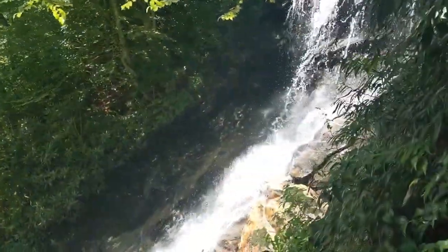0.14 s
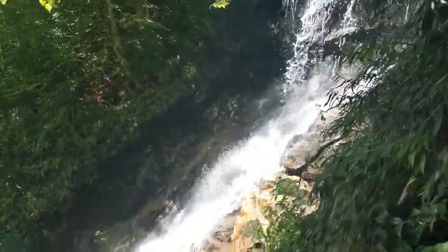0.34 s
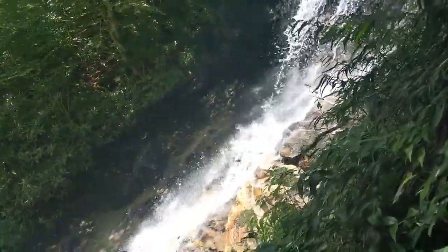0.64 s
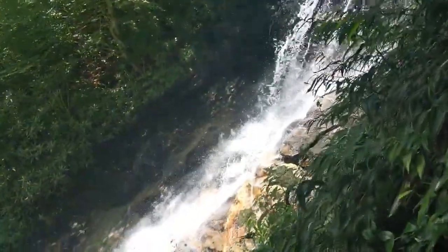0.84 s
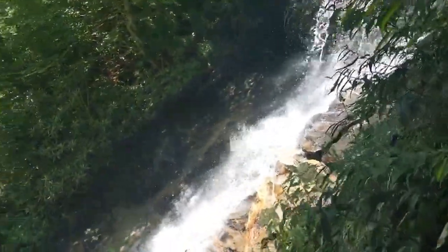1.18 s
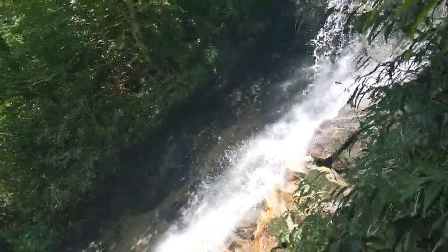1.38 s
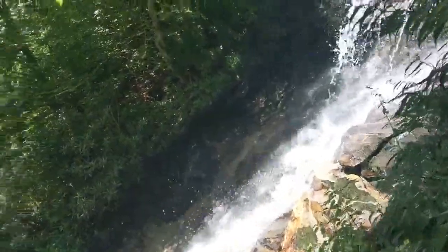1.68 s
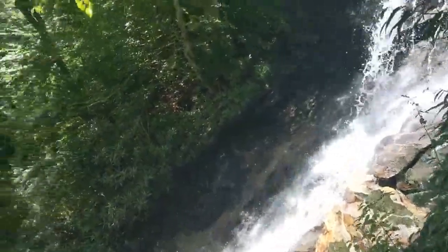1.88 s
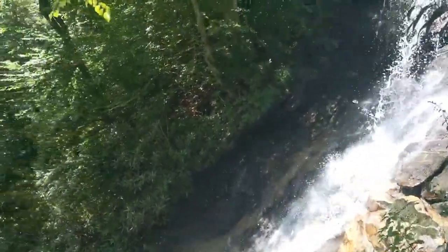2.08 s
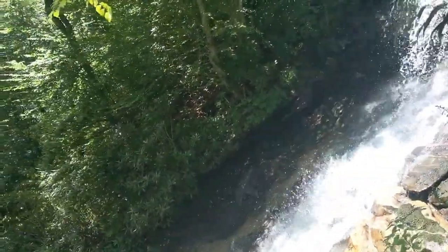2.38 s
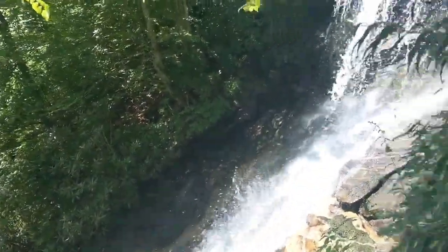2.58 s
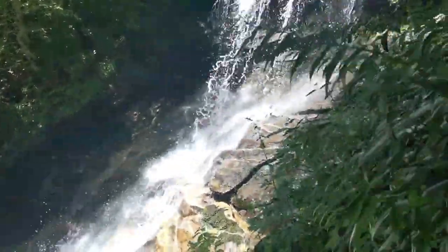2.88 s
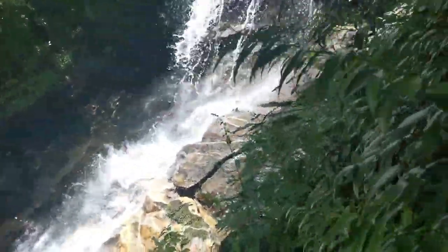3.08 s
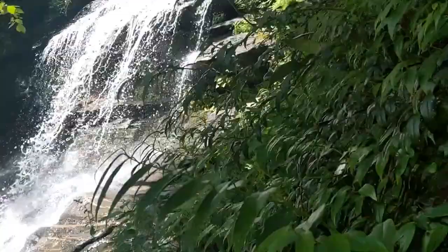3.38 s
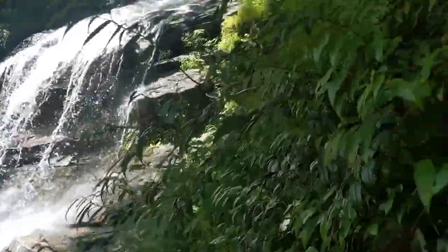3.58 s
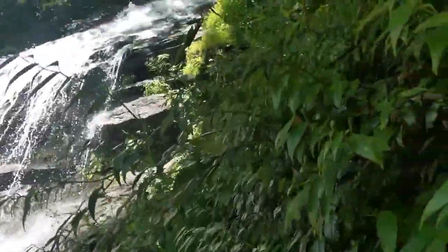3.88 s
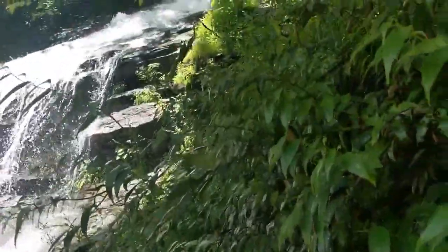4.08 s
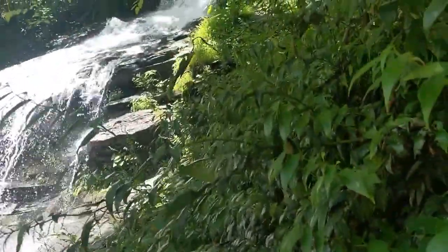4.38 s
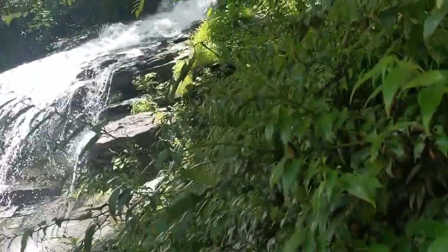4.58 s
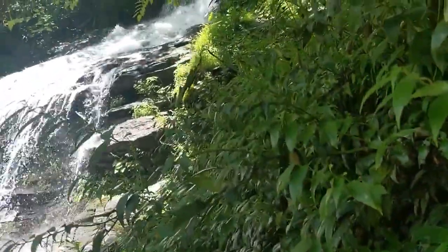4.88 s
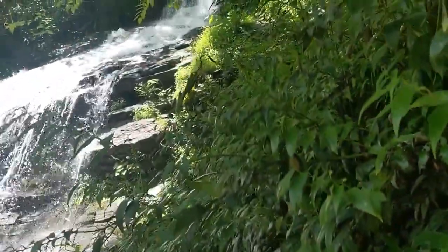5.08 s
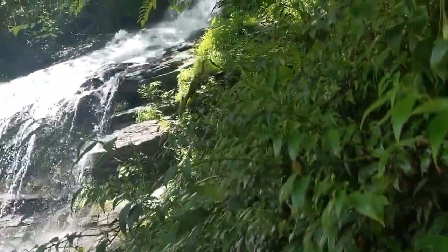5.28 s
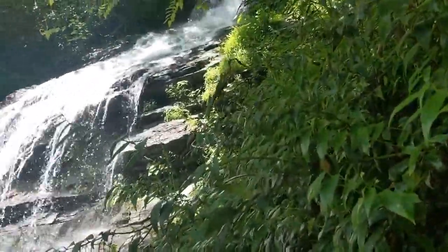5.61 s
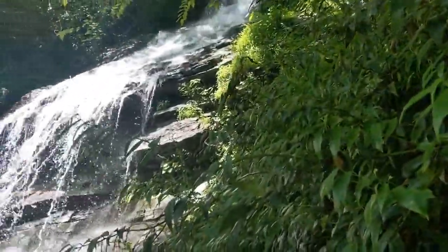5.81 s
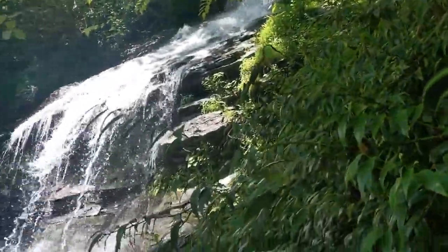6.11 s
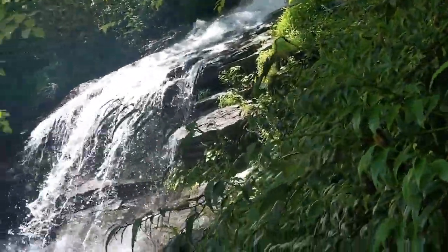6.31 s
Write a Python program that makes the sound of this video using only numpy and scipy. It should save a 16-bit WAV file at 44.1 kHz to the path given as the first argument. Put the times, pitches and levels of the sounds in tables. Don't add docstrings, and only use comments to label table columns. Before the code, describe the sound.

A waterfall rushes steadily down rocks among trees, heard from the bank in wide stereo. Countless drops merge into a bright, dense hiss over a churning middle and a modest low rumble. Irregular lumps of water slump with soft, hollow gulps. The flow grows slightly fuller until nearly four seconds, then stays strong, while the stereo picture shifts as the microphones turn away, leaning left in the low middle.

```python
import sys
import numpy as np
from scipy import signal
from scipy.fft import rfft, irfft, next_fast_len
from scipy.io import wavfile

SR = 44100
rng = np.random.default_rng(int(sys.argv[2]) if len(sys.argv) > 2 else 0)


def materialize(psi):
    bounded = np.clip(np.atleast_2d(psi).T, -1, 1)
    quanta = np.round(bounded * 32767).astype(np.int16)
    wavfile.write(sys.argv[1], SR, quanta)


def attenuation_scalar(level_db):
    decades = np.asarray(level_db, float) / 20
    return 10 ** decades


N = 284445
PAD = next_fast_len(N + 4096)
HZ = np.arange(PAD // 2 + 1) * SR / PAD + 1e-3


def in_time(rows):
    s, *columns = np.transpose(rows)
    return [np.interp(np.arange(N) / SR, s, column) for column in columns]


def in_pitch(rows):
    hz, *columns = np.transpose(rows)
    return [np.interp(np.log(HZ), np.log(hz), column) for column in columns]


def drift(rate):
    pole = np.exp(-80 * np.pi * rate / SR)
    coarse = rng.standard_normal(N // 40 + 3002)
    slow = signal.lfilter([1], [1, -2 * pole, pole * pole], coarse)[3000:]
    return np.interp(np.arange(N) / 40, np.arange(len(slow)), slow / slow.std())


def drops(near_per_s, near_db, uneven_db):
    hiss = rng.standard_normal((3, N))
    lands = rng.random((3, N)) < near_per_s / SR
    unevenness = np.minimum(rng.exponential(1, (3, N)), 2)
    sizes = attenuation_scalar(near_db + uneven_db * unevenness)
    return hiss + lands * sizes * rng.choice([-1, 1], (3, N))


# time in seconds, level in dB.
FLOW = [
    (0.0, -32),
    (0.12, -31.5),
    (0.93, -31),
    (1.47, -30.5),
    (3.5, -30),
    (3.72, -28.5),
    (5.77, -29),
    (5.78, -30),
    (6.16, -29),
    (6.45, -30),
]
# frequency in Hz, spectral density in dB per Hz.
RUSH_COLOUR = [(13, -34.5), (22, -17.5), (81, -15.5), (199, -12), (235, -15), (336, -9.5), (389, -12),
               (511, -8), (919, -6), (1180, -7), (1620, -5), (2040, -6.5), (3300, -1.5), (4290, -12),
               (7260, -120)]
# frequency in Hz, level relative to 3300 Hz in dB.
SPRAY_SLOPE = [(3300, 0.0), (6600, -3.2), (10500, -6.9), (12700, -8.9), (15800, -4.2)]
# centre in Hz, share of the flow's swing from 0 to 1,
# change when turned away in dB, swell around a slump in dB.
PARTS = [
    (28, .1, -8, 3),
    (70, .1, -0.5, 1.5),
    (220, .1, -.5, 3.0),
    (800, 0.27, -1, 1.2),
    (3470, .99, -0.4, 0.3),
]


def rush(surge_db, patch_db, flicker_db, lumpy_db):
    treble_db = RUSH_COLOUR[-3][1] + in_pitch(SPRAY_SLOPE)[0]
    colour_db = np.where(HZ < 3300, in_pitch(RUSH_COLOUR)[0], treble_db)
    water = rfft(drops(near_per_s=250, near_db=7.5, uneven_db=3.1), PAD) * attenuation_scalar(colour_db)
    part_hz, *response = np.transpose(PARTS)
    flow_db = in_time(FLOW)[0]
    swell_db = np.transpose(response) @ [flow_db - flow_db.mean(), in_time(TURN)[0] - .5, heave()]
    surge, patch, lumps = drift(8.6), drift(12), drift(27)
    out = np.zeros((3, N))
    for hz in 25 * 2 ** np.arange(0, 9.6, .5):
        share = np.maximum(1 - np.abs(np.log2(HZ / hz)) / .5, 0)
        weights = [np.interp(np.log(hz), np.log(part_hz), row) for row in np.eye(len(PARTS))]
        patch = .8 * patch + .6 * drift(12)
        chance_db = surge_db * surge + patch_db * patch + flicker_db * drift(26)
        chance_db = chance_db + lumpy_db * lumps / (1 + (hz / 500) ** 2)
        band = irfft(water * share, PAD)[:, :N]
        out += band * attenuation_scalar(weights @ swell_db + chance_db)
    return out / out.std() * attenuation_scalar(flow_db.mean() + 1.5)


BIG_SLUMP_DB = -40
SLUMP_S = .05


def heave():
    rise_s = 0.053
    s, slump_db, _ = np.transpose(SLUMPS)
    t = np.arange(0, N, 64) / SR
    since = np.maximum(t[:, None] - s + SLUMP_S / 2, 0) / rise_s
    bumps = attenuation_scalar(slump_db - BIG_SLUMP_DB) * since * np.exp(1 - since)
    return np.interp(np.arange(N) / SR, t, bumps.sum(axis=1))


# start in seconds, level in dB, middle pitch in Hz.
SLUMPS = [(0.12, -40.5, 140), (0.18, -44, 271), (0.31, -48.5, 180), (0.4, -46.5, 230), (0.69, -57, 60),
          (1.08, -48.5, 325), (1.21, -41, 250), (1.28, -44.5, 148), (2.08, -37.5, 594), (2.25, -41, 335),
          (2.33, -47.5, 160), (2.621, -50, 150), (2.92, -37.5, 475), (3.13, -43.5, 252), (3.26, -42, 280),
          (3.57, -39, 333), (3.63, -41, 370), (3.881, -45, 374), (4.21, -36, 390), (4.94, -39.5, 288),
          (5.27, -57, 90), (5.59, -37, 374), (5.65, -42, 352), (6.07, -38.5, 386), (6.38, -44, 600)]


def pockets(cycles, level_db, tilt_db, focus_db, count):
    out = np.zeros((3, N + SR))
    t = np.arange(round(.07 * SR)) / SR
    for (s, slump_db, hz), luck in zip(SLUMPS, rng.random((len(SLUMPS), count, 2))):
        octaves = max(1.82 + 0.13 * (slump_db - BIG_SLUMP_DB), .4)
        late = luck[:, :1] ** 1.3
        size = luck[:, 1:]
        pitch = octaves * np.linspace(-1, 1, count)[:, None]
        turns = hz * 2 ** pitch * t
        rings = np.sin(2 * np.pi * turns * (1 + 0.025 * turns)) * turns * np.exp(-turns / cycles)
        rings = rings * attenuation_scalar(tilt_db * pitch - focus_db * (pitch / octaves) ** 2 - 7 * size - 4 * late)
        energy = np.sum(rings ** 2) / len(t)
        rings = rings * attenuation_scalar(slump_db + level_db) / np.sqrt(energy)
        for k, ring in enumerate(rings):
            row = [0, 0, 1, 0, 2][k % 5]
            start = round((s + SLUMP_S * late[k, 0]) * SR)
            out[row, start:start + len(t)] += (-1) ** k * ring
    return out[:, :N]


def puff():
    start_s, length_s, level_db, hz = 1.47, 0.044, -50, 130
    band = signal.butter(2, [hz / 2, hz * 1.5], "band", fs=SR, output="sos")
    wind = signal.sosfilt(band, rng.standard_normal(N))
    shape = np.exp(-((np.arange(N) / SR - start_s) / length_s) ** 4)
    return np.outer([1, 0], attenuation_scalar(level_db) * shape * wind / wind.std())


# frequency in Hz, left-right level in dB.
PORT_STEP = [(6500, -0.03), (12000, -2), (15000, 3.5)]


def ports(water, picture):
    alike, lead, step_db = in_pitch(picture)
    alike = np.clip(alike, 0, 1)
    step_db = step_db + in_pitch(PORT_STEP)[0]
    shared, own = np.sqrt(alike) * water[0], np.sqrt(1 - alike)
    left = shared + own * water[1]
    right = shared * np.exp(-1j * lead) + own * water[2]
    return irfft(np.array([left * attenuation_scalar(step_db / 2), right * attenuation_scalar(-step_db / 2)]), PAD)[:, :N]


# time in seconds, direction from 0 (facing) to 1 (turned away).
TURN = [
    (0, 0),
    (2.5, .05),
    (3.2, .45),
    (3.7, .9),
    (4.1, .99),
    (6.45, .99),
]
# frequency in Hz, likeness of the ports from 0 to 1,
# lead of the left port in radians, left-right level in dB.
FACING = [(60, .88, -.2, 1.0), (170, .92, -.35, 1.3), (300, .86, -.7, 1.8), (480, .77, -.9, 1.8),
          (1000, .72, -.4, 3.7), (1400, .63, -.1, 5.7), (2200, .14, -1.5, 2.6), (6500, .06, -3.4, 2.2)]
TURNED = [(170, .97, -.25, 1.5), (300, .88, -.6, 5.7), (500, .65, -.1, 11.0), (1150, .6, .9, 7.0),
          (1750, .17, 2.9, 5.3), (2200, .23, 4.0, 2.4), (3000, .28, 5.9, 2.1), (4500, .05, 8.8, 2.0)]


def scene():
    water = rush(surge_db=-0.15, patch_db=0.5, flicker_db=0.59, lumpy_db=1.16)
    water = water + pockets(cycles=0.72, level_db=-1.5, tilt_db=7.5, focus_db=8.5, count=70)
    water = rfft(water, PAD)
    turn = np.clip(in_time(TURN)[0], 0, 1)
    return (1 - turn) * ports(water, FACING) + turn * ports(water, TURNED) + puff()


def top_cut(x):
    return signal.sosfilt(signal.butter(12, 15765, fs=SR, output="sos"), x)


# centre in Hz, width in Hz, left gain in dB, right gain in dB.
PORT_MODES = [(950, 220, 1.6, 1.6), (2000, 350, -2.5, -3), (4150.0, 610.0, 1.6, 1.7),
              (5710.0, 1010.0, 5.0, 5.1), (7490.0, 1070.0, 4.4, 4.8), (9540.0, 1240.0, 5.8, 5.6),
              (11610.0, 990.0, 4.4, 5.0), (13840.0, 1400.0, 4.0, 4.2), (15580.0, 730.0, 0.8, -2.0)]


def record(dry):
    ripple_db = 0
    for hz, width, left_db, right_db in PORT_MODES:
        resonance = 1 / (1 + (2 * (HZ - hz) / width) ** 2)
        ripple_db = ripple_db + np.outer([left_db, right_db], resonance)
    heard = irfft(rfft(dry, PAD) * attenuation_scalar(ripple_db) * (HZ < 15765), PAD)[:, :N]
    balance = attenuation_scalar(np.array([[.2], [-.2]]))
    heard = .45 * np.tanh(heard * balance / .45)
    return top_cut(heard)


dry = scene()
out = record(dry)
materialize(out)
```